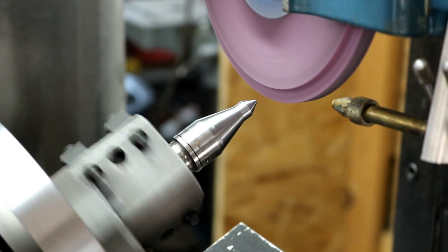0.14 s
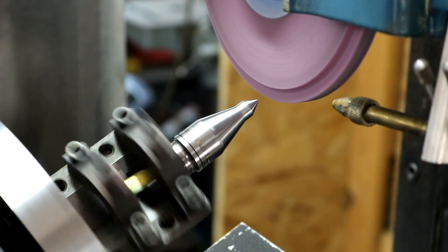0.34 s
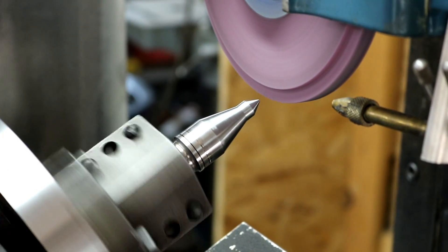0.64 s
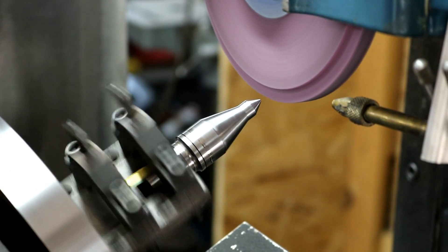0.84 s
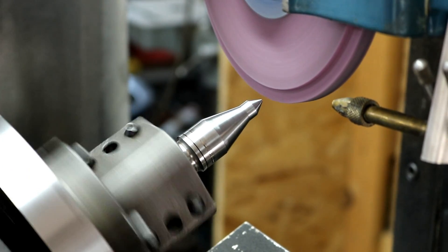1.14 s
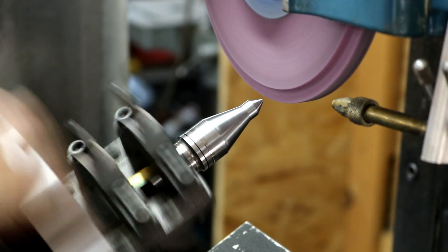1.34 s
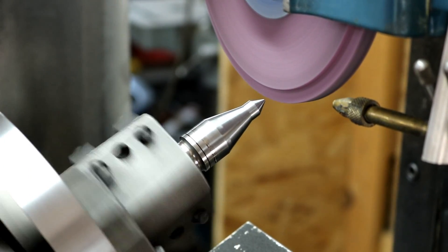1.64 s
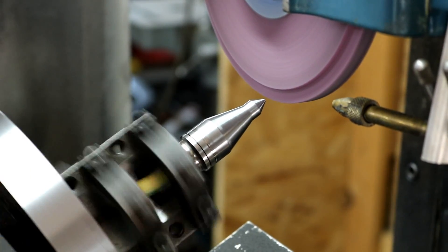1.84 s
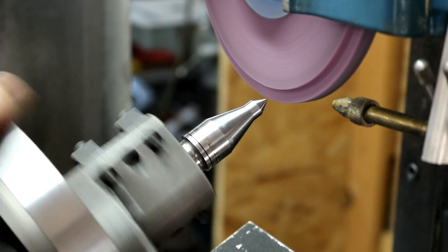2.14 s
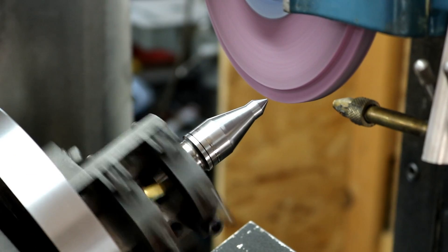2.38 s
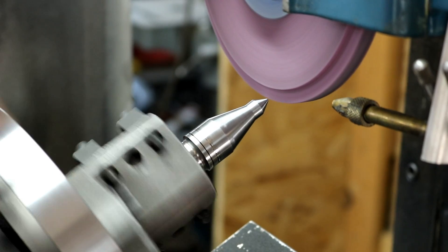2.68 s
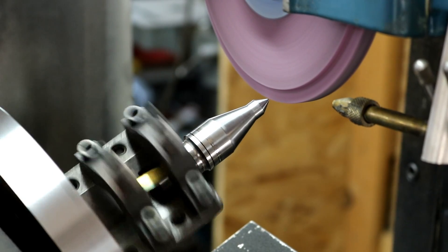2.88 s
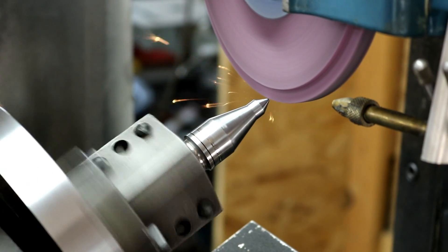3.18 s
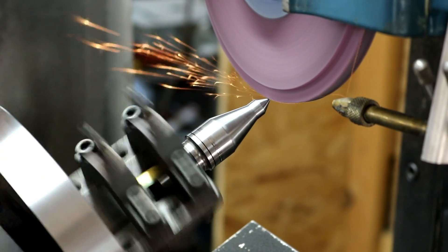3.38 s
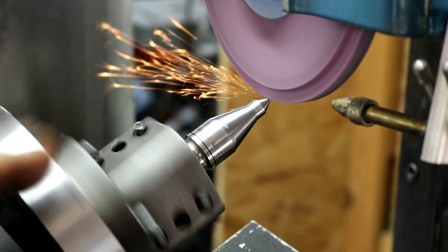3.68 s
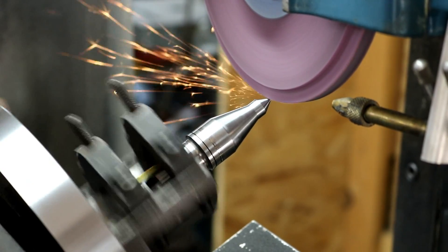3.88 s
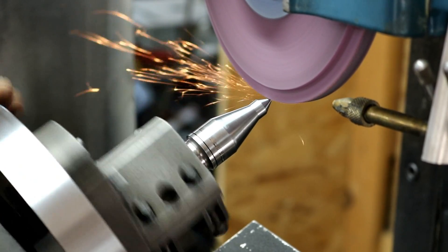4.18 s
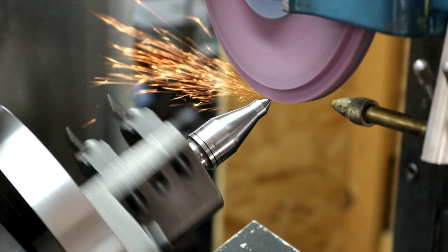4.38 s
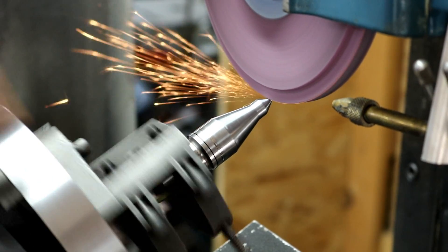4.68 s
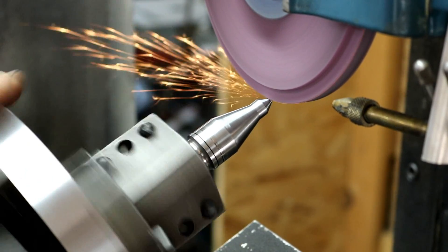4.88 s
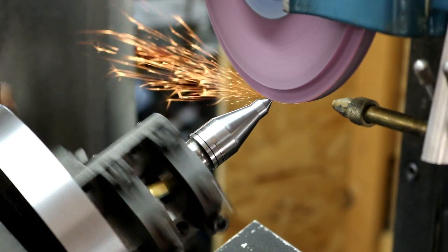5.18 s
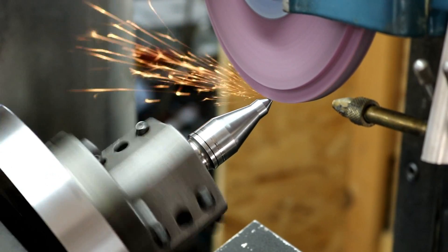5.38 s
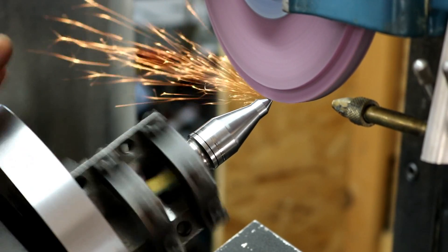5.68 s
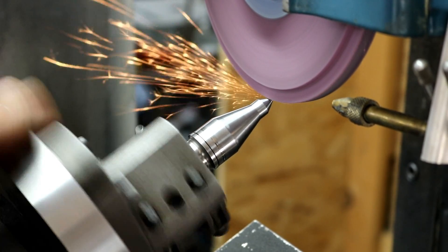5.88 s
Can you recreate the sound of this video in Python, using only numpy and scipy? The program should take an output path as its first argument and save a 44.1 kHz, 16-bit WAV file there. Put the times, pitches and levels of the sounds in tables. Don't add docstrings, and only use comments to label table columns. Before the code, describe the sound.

Close in a workshop, a running grinder gives a dense, wavering whine of many steady-pitched tones over rough rolling bearing noise. Motor hum and a gusting dust fan sit behind. Around three seconds a steel point touches the wheel, adding a very high, thin hiss that firms up and flares several times a second as its sides bite, continuing to the end.

```python
import sys
import numpy as np
from scipy import signal
from scipy.fft import rfft, irfft, next_fast_len
from scipy.io import wavfile

SR = 44100
rng = np.random.default_rng(int(sys.argv[2]) if len(sys.argv) > 2 else 0)


def boost_factor(decibels):
    exponent = np.asarray(decibels, float) / 20
    return 10 ** exponent


def store_pcm(level_fs):
    pcm = np.round(np.clip(level_fs, -1, 1) * 32767).astype(np.int16)
    wavfile.write(sys.argv[1], SR, np.atleast_2d(pcm).T)


N = 265923
T = np.arange(N) / SR
STEP = 200
SLOW = np.arange(0, N + STEP, STEP) / SR
WHEEL_HZ, BALL_HZ, CAGE_HZ = 59.9, 407.8, 25.93
CALM_DB = -54


def in_time(rows):
    s, *columns = np.transpose(rows)
    return [np.interp(SLOW, s, c) for c in columns]


def at_hz(points, hz):
    point_hz, point_db = np.transpose(points)
    return np.interp(np.log(hz), np.log(point_hz), point_db)


def rms_one(x):
    return x / np.sqrt(np.mean(x ** 2) + 1e-20)


def gain_of(db):
    return np.interp(T, SLOW, boost_factor(db + 0 * SLOW))


def drift(rate_hz):
    r = np.exp(-2 * np.pi * rate_hz * STEP / SR)
    noise = rng.standard_normal(len(SLOW) + 1000)
    slow = signal.lfilter([1], [1, -2 * r, r * r], noise)[1000:]
    return rms_one(slow - slow.mean())


def swells(rows, calm_db):
    arches = sum(boost_factor(db) * np.sin(np.pi * np.clip((SLOW - s) / length, 0, 1)) for s, length, db in rows)
    return 20 * np.log10(boost_factor(calm_db) + arches)


def bump(s, half_s):
    return np.exp(-.5 * ((SLOW - s) / half_s) ** 2)


def sine(phase, level_db):
    return gain_of(level_db) * np.sqrt(2) * np.sin(np.interp(T, SLOW, phase))


def tone(hz, level_db, wobble, slip=1.04):
    phase = 2 * np.pi * (hz * SLOW + rng.random()) + wobble * drift(3.2) + slip * drift(.25)
    return sine(phase, level_db)


def resonate(x, hz, width_hz):
    r = np.exp(-np.pi * width_hz / SR)
    peak = np.array([1, 0, -1]) * (1 - r * r) / 2
    return signal.lfilter(peak, [1, -2 * r * np.cos(2 * np.pi * hz / SR), r * r], x)


def cage_family(ball, tones, low_warble, top_warble):
    centre = 2 * np.pi * (ball * BALL_HZ * SLOW + rng.random()) + 0.98 * drift(0.24)
    cage = 2 * np.pi * (CAGE_HZ * SLOW + rng.random()) + 0.52 * drift(.5)
    out = 0
    for side, rows in enumerate(tones, -1):
        turned = low_warble if side < 0 else top_warble * (side > 1)
        phase = centre + side * cage + np.pi * turned + 0.1 * drift(3.3)
        out = out + sine(phase, swells(rows, CALM_DB))
    return out


# start in seconds, length in seconds, peak in dB.
REAR_SWELLS = [
    [(-2.0, 3.25, -40.0), (0.39, 3.38, -30.5), (2.54, 0.93, -37.0), (3.28, 2.63, -34.0)],
    [(-0.87, 2.72, -28.0), (0.98, 1.24, -35.0), (1.86, 3.0, -40.0), (2.49, 3.5, -33.5), (5.7, 2.13, -30.5)],
    [(-0.12, 1.13, -35.5), (0.3, 1.58, -33.0), (1.38, 0.95, -40.0), (1.73, 3.94, -36.5), (4.69, 4.0, -38.0)],
]
# start in seconds, length in seconds, peak in dB.
NOSE_SWELLS = [
    [(-0.42, 1.25, -48.5), (0.37, 2.54, -38.0), (2.96, 2.74, -41.5), (5.25, 4.0, -33.0)],
    [(-1.03, 1.43, -24.5), (0.35, 1.41, -26.0), (0.39, 0.49, -32.0), (1.37, 1.43, -28.5),
     (1.74, 1.71, -24.0), (2.86, 2.12, -27.5), (4.42, 1.73, -31.0)],
    [(-0.79, 1.55, -33.0), (0.33, 1.7, -35.0), (2.04, 1.19, -36.0), (3.35, 2.27, -42.0), (4.1, 3.03, -48.0)],
    [(-1.48, 2.28, -39.0), (0.34, 1.72, -32.5), (2.08, 1.04, -39.0), (2.96, 2.53, -39.5),
     (5.38, 1.0, -41.5)],
]
# time in seconds, then shares 0-1 for the rear, nose lower sideband and nose top sideband.
CAGE_WARBLE = [(.15, .95, .05, .6), (.5, .1, .9, .85), (1.2, .2, .3, .35), (1.7, .3, .8, .7),
               (2.05, .5, .8, .1), (2.5, .1, .2, .45), (3.4, .15, .9, .4), (4.2, .6, .2, .1),
               (4.9, .95, .2, .03), (5.3, .85, .35, .05), (5.9, .4, .45, .9)]


def rear_and_nose():
    rear, nose_low, nose_top = in_time(CAGE_WARBLE)
    return cage_family(2, REAR_SWELLS, rear, 0) + cage_family(4, NOSE_SWELLS, nose_low, nose_top)


FRONT_ORDERS = [(6, -1), (6, 1), (7, -1), (7, 1)]
# start in seconds, length in seconds, peak in dB.
FRONT_SWELLS = [
    [(-2.0, 2.91, -23.0), (0.71, 1.61, -23.5), (2.33, 0.8, -21.0), (2.62, 1.94, -19.0), (3.3, 0.77, -30.5),
     (3.96, 1.43, -26.0), (4.5, 3.98, -31.5)],
    [(-0.37, 2.27, -35.0), (0.75, 1.6, -30.5), (1.97, 0.83, -31.5), (2.08, 1.76, -38.0), (3.38, 3.6, -29.5),
     (3.95, 0.7, -41.5)],
    [(-1.21, 2.94, -24.0), (1.55, 0.64, -37.0), (1.82, 1.94, -31.0), (2.94, 0.78, -35.5),
     (3.46, 2.58, -31.5), (5.78, 0.54, -34.5)],
    [(-0.61, 2.56, -36.5), (0.02, 0.67, -37.5), (1.39, 1.21, -26.0), (2.44, 2.87, -30.0),
     (4.89, 4.0, -27.5)],
]
HOUSING_ORDERS = [(5, -1), (8, -1), (8, 1), (3, 0)]
# start in seconds, length in seconds, peak in dB.
HOUSING_SWELLS = [
    [(0.17, 1.68, -36.5), (1.44, 1.45, -34.5), (2.79, 1.58, -45.5), (4.25, 1.62, -38.0)],
    [(-0.04, 0.81, -42.5), (0.54, 3.31, -39.0), (2.02, 0.29, -38.5), (3.97, 2.32, -32.5)],
    [(-0.08, 0.36, -34.0), (-0.01, 1.74, -41.0), (1.0, 3.2, -40.0), (3.04, 0.52, -35.0), (3.8, 1.89, -37.0),
     (4.17, 0.58, -39.5)],
    [(0.08, 3.22, -41.0), (1.22, 4.0, -37.0), (3.9, 4.0, -48.0)],
]
GUARD_ORDERS = [(9, -1), (10, -1), (11, 1), (12, -1)]
# start in seconds, length in seconds, peak in dB.
GUARD_SWELLS = [
    [(-0.78, 2.27, -54.5), (3.12, 0.58, -42.5), (3.27, 4.0, -49.5)],
    [(0.05, 0.66, -54.5), (1.54, 1.19, -51.0), (3.88, 1.73, -40.5)],
    [(-0.92, 3.4, -49.5), (3.08, 0.34, -47.5), (4.29, 1.49, -54.5)],
    [(-1.66, 4.0, -55.5), (3.64, 0.58, -46.5), (4.65, 0.73, -48.5)],
]


def front_housing_and_guard():
    parts = [(FRONT_ORDERS, FRONT_SWELLS), (HOUSING_ORDERS, HOUSING_SWELLS), (GUARD_ORDERS, GUARD_SWELLS)]
    out = 0
    for orders, part in parts:
        for (ball, cage), rows in zip(orders, part):
            out = out + tone(ball * BALL_HZ + cage * CAGE_HZ, swells(rows, CALM_DB), wobble=0.13)
    return out


WEAK_ORDERS = [(2, -2, 0), (2, 2, 0), (2, 3, 0), (2, 4, 0), (3, -2, 0), (3, 1, 0), (3, 2, 0), (4, -2, 0),
               (4, 0, 1), (5, 3, 0), (6, -1, -2), (6, -3, 0), (6, 3, 0), (6, -1, 2), (6, 1, 2), (7, -3, 0),
               (7, 0, 0), (7, 2, 0), (7, 3, 0), (8, -3, 0), (8, -1, 2), (9, 1, 0), (10, 1, 0), (11, -1, 0),
               (12, 1, 0)]
WEAK_LEVELS = [-41.0, -44.5, -47.5, -45.0, -49.0, -46.5, -51.5, -42.5, -46.5, -51.5, -47.5, -48.5, -45.0,
               -44.0, -42.5, -45.5, -48.0, -48.5, -43.0, -47.5, -47.0, -49.5, -51.5, -53.0, -55.0]
# frequency in Hz, level of a tone in dB.
HIGH_LEVELS = [(5400, -67), (6150, -57), (7000, -66), (7700, -73.5), (9300, -61.5), (11000, -73.5)]


def weak_and_high_orders():
    out = 0
    for (ball, cage, wheel), db in zip(WEAK_ORDERS, WEAK_LEVELS):
        hz = ball * BALL_HZ + cage * CAGE_HZ + wheel * WHEEL_HZ
        out = out + tone(hz, db - 1.5 + 2.9 * drift(1.4), wobble=.4)
    for ball in range(13, 28):
        for hz in (ball * BALL_HZ - CAGE_HZ, ball * BALL_HZ + CAGE_HZ):
            out = out + tone(hz, at_hz(HIGH_LEVELS, hz) + 5.3 * drift(0.65), wobble=.3)
    return out


def bearings():
    return rear_and_nose() + front_housing_and_guard() + weak_and_high_orders()


# time in seconds, level in dB.
HAND_PRESSURE = [
    (2.9, -9),
    (3.3, -5),
    (3.6, -1.5),
    (4.5, 0),
    (5.3, 0),
    (6.03, -2.5),
]
# time in seconds, bite from 0 to 2.
SIDE_BITES = [(3.38, .3), (3.6, .35), (3.78, .2), (3.95, 1.1), (4.16, .95), (4.37, .8), (4.53, 1.1),
              (4.75, .6), (4.96, .9), (5.13, 1.2), (5.31, 1.2), (5.51, .8), (5.65, .9), (5.85, 1.3)]
BITE_HALF_S = [.05, .035, .035]
# rest level in dB, flare in dB on side one, two, three.
RING_FLARES = [
    (-55.5, 9, 4, 2.5),
    (-53, 4, 7, 3),
    (-57, 2.5, 9, 8),
    (-52.5, 2.5, .4, .8),
]
# time in seconds, half length in seconds, change in dB.
HAND_EASES = [
    (4.08, .03, -2),
    (4.3, .03, -1.5),
    (5.39, .03, -5),
    (5.715, .022, -15),
]


def cut_levels():
    hand_db = in_time(HAND_PRESSURE)[0] + sum(db * bump(s, half_s) for s, half_s, db in HAND_EASES)
    levels = []
    for rest_db, *flare_db in RING_FLARES:
        level_db = rest_db + hand_db
        for k, (s, bite) in enumerate(SIDE_BITES):
            side = k % len(BITE_HALF_S)
            level_db = level_db + bite * flare_db[side] * bump(s, BITE_HALF_S[side])
        levels.append(level_db)
    return levels


# frequency in Hz, width in Hz, level in dB.
LOW_RINGS = [(14170, 240, 0), (7270, 90, -1)]
MIDDLE_RINGS = [(14420, 200, -2), (14700, 130, 0), (14880, 120, 0)]
TOP_RINGS = [(15250, 150, -5), (15400, 120, -2), (15560, 110, -1)]
HISSING_RINGS = [(6940, 80, 1), (10950, 200, -2), (11350, 150, -2), (12020, 120, 0), (12650, 200, -4),
                 (13100, 250, -2), (13810, 60, 0)]


def ring_point(scratch, rings):
    body = 0
    for k, (hz, width_hz, ring_db) in enumerate(rings):
        ring = resonate(resonate(scratch, hz, 1.5 * width_hz), hz, 1.5 * width_hz)
        flare = gain_of(ring_db + 1.6 * drift(7.3))
        body = body + (-1) ** k * flare * ring / np.sqrt(width_hz)
    return body


def grinding():
    turn = WHEEL_HZ * T
    pattern = rng.standard_normal(736)
    grit = np.interp(turn % 1 * 736, np.arange(736), pattern, period=736)
    repeating = 1.1 * rms_one(np.diff(grit, prepend=0))
    runout = 1 + .55 * np.cos(2 * np.pi * turn)
    runout = runout + .2 * np.cos(4 * np.pi * turn + 1.1) + .3 * np.cos(6 * np.pi * turn + 1.4)
    contact = np.clip((T - HAND_PRESSURE[0][0]) / .55, 0, 1)
    out = 0
    for rings, db in zip((LOW_RINGS, MIDDLE_RINGS, TOP_RINGS, HISSING_RINGS), cut_levels()):
        fresh = rng.standard_normal(N)
        scratch = runout * (repeating + fresh) * gain_of(1.8 * drift(40))
        out = out + gain_of(db + 1.5) * rms_one(ring_point(scratch, rings))
    return contact * out


def faint_comb(hz, over_db, scatter_db, width_hz):
    ball, cage, wheel = np.meshgrid(np.arange(1, 38), np.arange(-4, 5), np.arange(-2, 3))
    mix_hz = ball * BALL_HZ + cage * CAGE_HZ + wheel * WHEEL_HZ
    at = np.round(mix_hz / (hz[1] - hz[0])).astype(int)
    scatter = scatter_db * rng.standard_normal(at.shape)
    ridges = np.zeros(len(hz))
    ridges[at] = boost_factor(over_db - 1.2 * np.abs(cage) - 5.3 * np.abs(wheel) + scatter) ** 2
    ridge_shape = 1 / (1 + (2 * (hz[:201] - hz[100]) / width_hz) ** 2)
    return np.convolve(ridges, ridge_shape, "same")


# frequency in Hz, level in dB per Hz.
ROLLING_COLOUR = [(30, -40), (90, -16.5), (200, -7), (500, -7.5), (750, 0.5), (1100, -2), (2800, -4),
                  (4200, -8), (5500, -11), (6600, -12.5), (7900, -20.5), (11500, -23.5), (14000, -23.5),
                  (15800, -31)]
# frequency in Hz, width in Hz, level in dB over the rolling noise.
ROLLING_HUMPS = [(520, 90, -3.5), (704, 320, 6.5), (830, 190, -1.5), (1230, 100, -4.5), (1550, 60, 5),
                 (2200, 75, -1.5), (2400, 106, 7.5), (2865, 160, 3.5), (3230, 260, 5), (3920, 130, -2.5),
                 (4120, 67, 4.5), (4590, 440, 0.5), (4700, 250, -1), (5330, 100, -3), (5770, 100, 0),
                 (6200, 78, 8), (6700, 150, 6), (6950, 140, 2), (7340, 170, 3), (8150, 160, 5.5),
                 (8900, 120, 6), (9790, 930, 10.5), (10620, 100, 7), (11000, 100, 0), (12950, 250, 5),
                 (13830, 100, 3), (14500, 120, 7)]
# start in seconds, length in seconds, peak in dB relative to its rest.
HOUSING_RING_SWELLS = [
    (.7, 1.4, -3),
    (2.35, 1.1, -2),
    (3.3, .6, -1),
    (3.6, 1.8, -3),
    (5.4, 1.2, -7),
]
# time in seconds, level in dB.
SPINDLE_LOAD = [
    (0, -.5),
    (.5, .3),
    (1.5, 0),
    (2.3, .9),
    (3.04, -1),
    (3.9, -.4),
    (5.1, .8),
    (6.03, .3),
]


def rolling():
    ring_db = swells(HOUSING_RING_SWELLS, calm_db=0)
    size = next_fast_len(N)
    hz = np.fft.rfftfreq(size, 1 / SR) + 1e-3
    humps = 0
    for top_hz, width_hz, db in ROLLING_HUMPS:
        humps = humps + (boost_factor(db) ** 2 - 1) / (1 + (2 * (hz - top_hz) / width_hz) ** 2) ** 2
    ridges = faint_comb(hz, over_db=8.5, scatter_db=3.5, width_hz=1.4)
    colour = boost_factor(at_hz(ROLLING_COLOUR, hz)) * np.sqrt(np.maximum(1 + humps, .1) * (1 + ridges))
    noise = rms_one(irfft(colour * rfft(rng.standard_normal(size)), size)[:N])
    bass = signal.sosfiltfilt(signal.butter(2, 500, fs=SR, output="sos"), noise)
    treble = signal.sosfiltfilt(signal.butter(2, 3500, "high", fs=SR, output="sos"), noise)
    ring = resonate(noise, 9800, 1500)
    knock = 1 + .1 * np.cos(2 * np.pi * BALL_HZ * T)
    half_turn = 1 + .1 * np.cos(4 * np.pi * CAGE_HZ * T)
    throb = knock * half_turn
    moving = noise - bass + (throb - 1) * treble + (gain_of(ring_db - ring_db.mean()) - 1) * ring
    return boost_factor(-29) * (bass + gain_of(in_time(SPINDLE_LOAD)[0]) * moving)


# frequency in Hz, level in dB.
MOTOR_TONES = [(59.9, -64), (119.8, -60), (179.7, -59.5), (279.3, -60.5), (299.4, -53.5), (419.2, -41),
               (459.6, -54.5), (558.7, -57), (1317.6, -48.5), (1497.2, -47), (1940, -50), (2059.8, -50),
               (2180.2, -49), (3497.8, -54), (3880, -50), (4120.2, -56), (4838.9, -51), (6180, -67),
               (6300.3, -56), (10360.8, -65)]


def motor():
    hum_db = -40 - 1.6 * SLOW
    out = tone(952.2, hum_db + 2.2 * drift(1.5), wobble=.3)
    for hz, db in MOTOR_TONES:
        out = out + tone(hz, db + 1.2 * drift(1.2), wobble=0.21, slip=0.12)
    return out


# start in seconds, length in seconds, peak in dB.
FAN_GUSTS = [(-1.02, 1.4, -36.0), (0.32, 0.48, -40.0), (0.63, 0.73, -38.5), (0.96, 0.1, -37.0),
             (1.06, 0.56, -39.0), (1.56, 0.33, -34.0), (1.89, 0.22, -28.0), (2.03, 0.25, -40.0),
             (2.15, 0.29, -35.5), (2.42, 0.13, -30.0), (2.54, 0.19, -29.5), (2.72, 0.24, -29.0),
             (2.88, 0.19, -32.5), (3.07, 0.3, -35.0), (3.31, 0.34, -37.5), (3.61, 0.35, -38.0),
             (3.93, 0.29, -36.5), (4.12, 0.26, -43.5), (4.41, 0.15, -43.5), (4.61, 0.27, -32.5),
             (4.78, 0.24, -42.0), (5.01, 0.19, -39.5), (5.2, 0.34, -35.5), (5.36, 0.75, -40.0)]
# start in seconds, length in seconds, peak in dB.
FIFTH_SWELLS = [
    (-2.0, 2.18, -31.0),
    (0.16, 1.54, -47.5),
    (1.42, 1.85, -44.0),
    (2.55, 1.82, -49.5),
    (3.48, 3.3, -58.5),
    (5.04, 0.66, -46.0),
]


def fan():
    fan_hz, blur = 117.4, .8
    gust_db = swells(FAN_GUSTS, calm_db=-47)
    fifth_db = (gust_db + swells(FIFTH_SWELLS, CALM_DB)) / 2 - 1.5
    fifth = tone(5 * fan_hz, fifth_db + 1.5 * drift(5.), blur)
    sixth = tone(6 * fan_hz, gust_db - .7, blur)
    fourth = tone(4 * fan_hz, -59.5, blur)
    companion = tone(654.7, -49 + 2.2 * drift(3.7), blur)
    return fifth + sixth + fourth + companion


def scene():
    return (bearings() + grinding() + rolling() + motor() + fan())[None]


def low_pass(x):
    return signal.sosfilt(signal.butter(12, 15745, fs=SR, output="sos"), x)


def record(dry):
    return low_pass(dry)


dry = scene()
out = record(dry)
store_pcm(out)
```